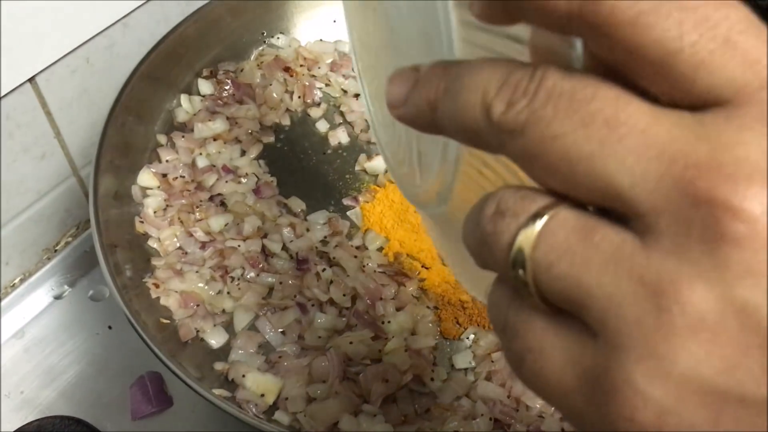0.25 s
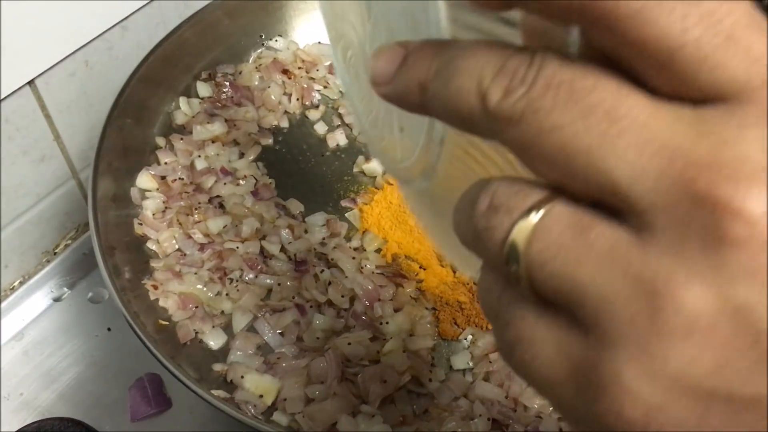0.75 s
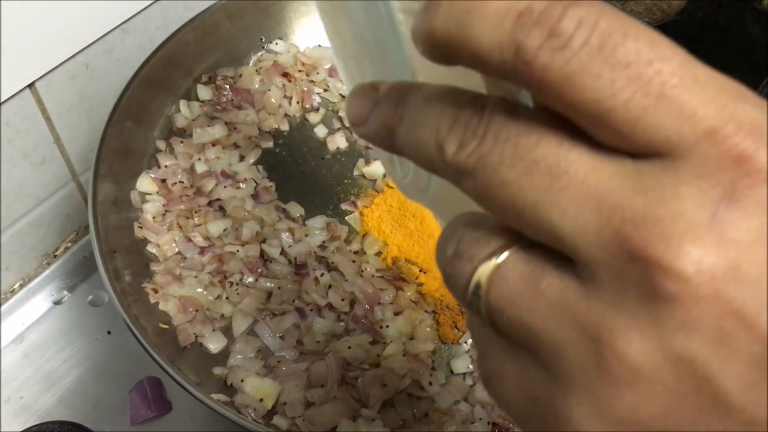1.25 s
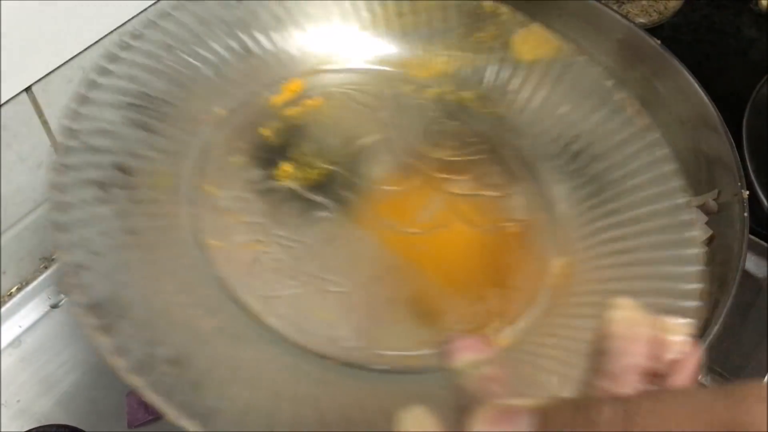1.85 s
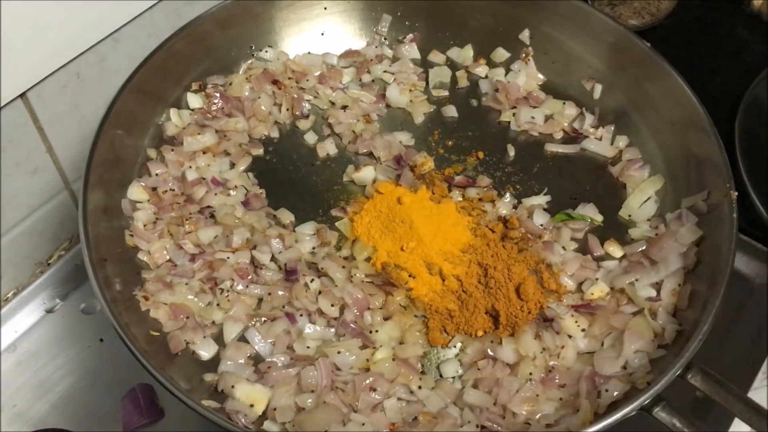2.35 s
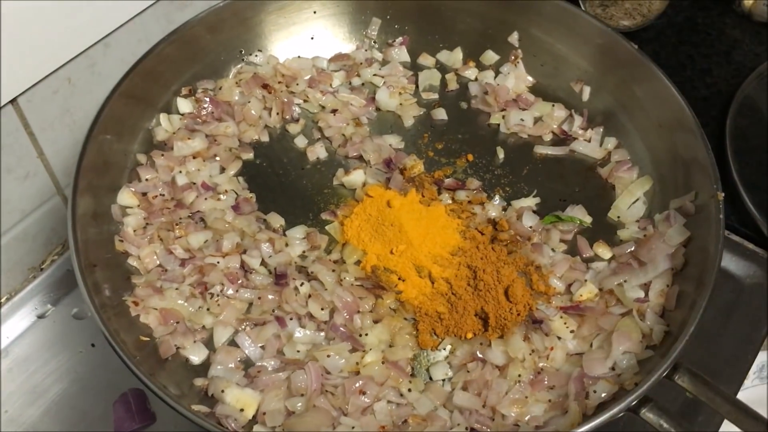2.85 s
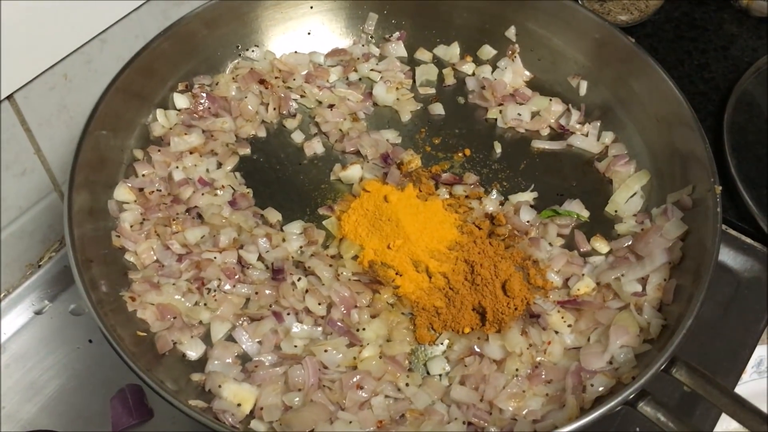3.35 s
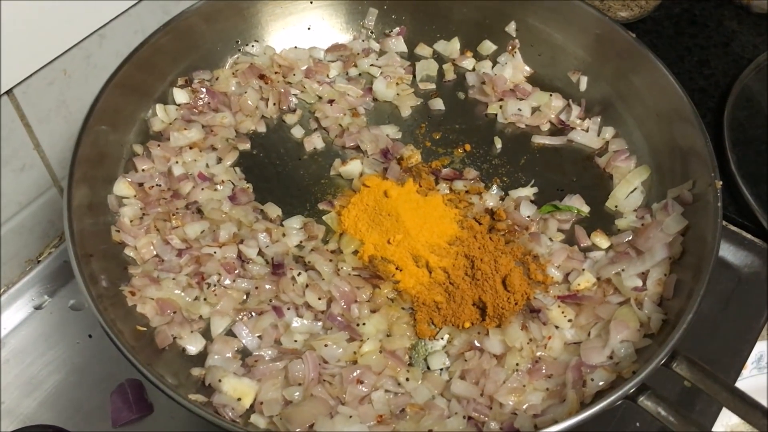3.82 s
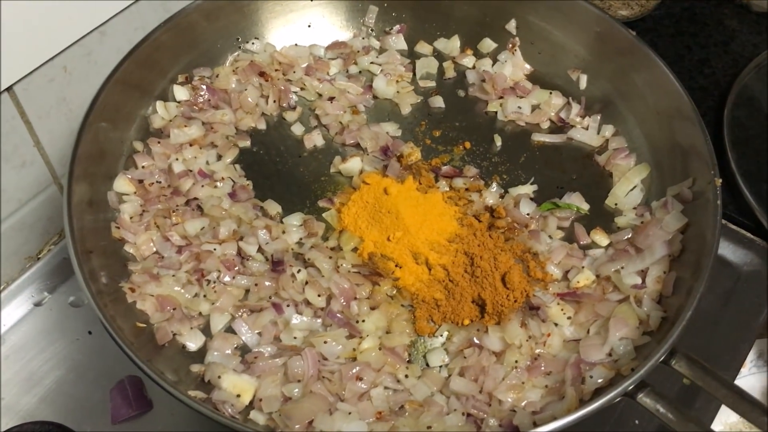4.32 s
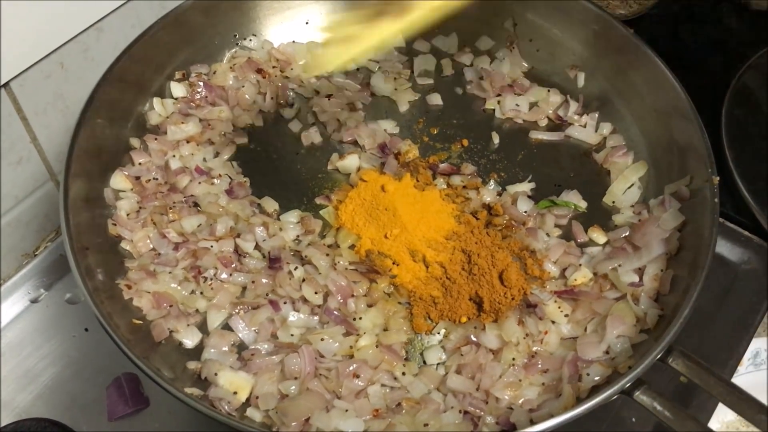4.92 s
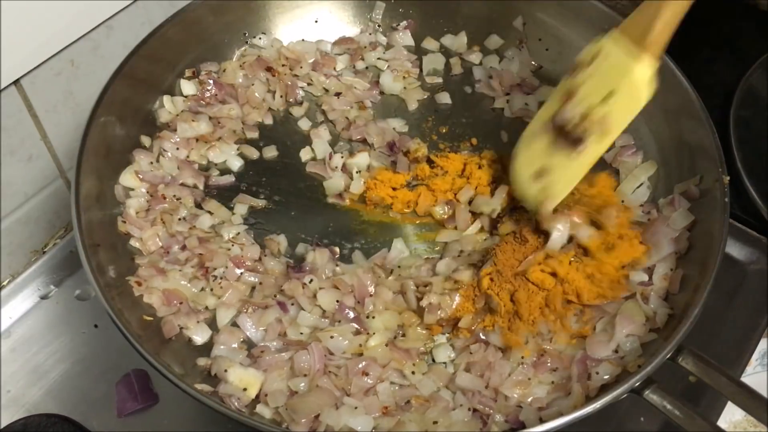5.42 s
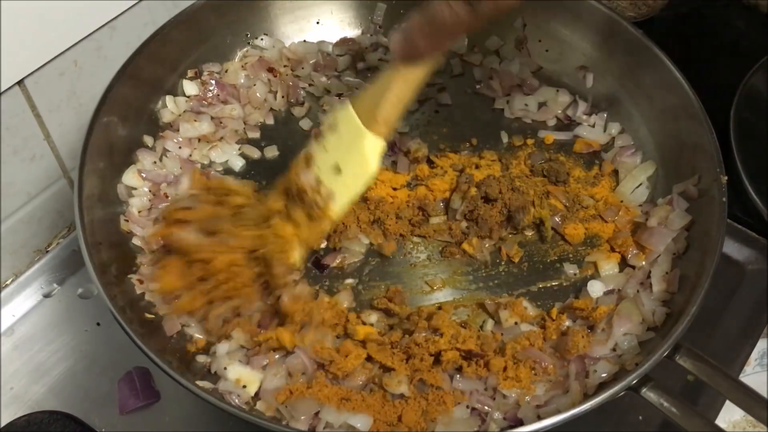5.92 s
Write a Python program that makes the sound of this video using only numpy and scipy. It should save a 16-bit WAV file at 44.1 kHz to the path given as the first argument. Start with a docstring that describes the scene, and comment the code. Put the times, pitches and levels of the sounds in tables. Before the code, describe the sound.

Light glassy clinks over gentle frying, a sharp knock, a plate set down rattling on a counter, then brief swells of sizzle as onions are stirred.

```python
"""Glass taps ring out over gently frying onions, in a small, hard-walled kitchen.
A plate is tapped on the rim of a steel pan to tip spices in, knocks the pan as it is drawn away,
is set down, rocks, and clatters against a dish; then a spatula turns the onions and the sizzle swells.
Contacts are decaying modes over a noise clack, frying is random bursts over hiss,
rocking is throbbing noise through counter resonances."""
import sys
import numpy as np
from scipy import signal
from scipy.fft import rfft, irfft, next_fast_len
from scipy.io import wavfile
from scipy.ndimage import uniform_filter1d

SR = 44100
rng = np.random.default_rng(int(sys.argv[2]) if len(sys.argv) > 2 else 0)


def transcribe(signal):
    """Save signal, clipped to [-1, 1], as a 16-bit WAV file at the path in sys.argv[1]."""
    frames = np.atleast_2d(signal).T
    limited = np.clip(frames, -1, 1)
    pcm = np.round(limited * 32767).astype(np.int16)
    wavfile.write(sys.argv[1], SR, pcm)


N = 272185
TIME = np.arange(N) / SR
RING_TIME = TIME[:SR // 4]
CUTOFF_HZ = 16000

# Spectrum of resting sizzle and spits: f/Hz, relative density/dB per Hz
SIZZLE_SPECTRUM = [(200, -9.5), (400, -10), (600, -5.5), (800, -12.5), (1200, -8.5), (1700, -10),
                   (2600, -10.5), (3300, -4), (4500, -6), (6000, -4.5), (7200, -2.5), (9000, -4.5),
                   (11500, -14), (16000, -16)]
# Modes of the dish: f/Hz, relative level/dB, t60 before grip and damping/s
DISH_MODES = [(1410, -4, 0.033), (1710, -7, 0.032), (2386, -3, 0.056), (2490, -4.5, 0.15),
              (3010, -6.5, 0.1), (3470, -21, 0.085), (4244, -9, 0.12), (5017, -7, 0.14), (5550, -5, 0.078),
              (6137, -1, 0.065), (6450, 5, 0.033), (6700, -10, .1), (7340, -12, 0.083), (7727, -1, 0.096),
              (8340, -3, 0.063), (8610, -6, 0.08), (9510, -9.5, 0.11), (11400, -9.5, 0.056),
              (12500, -16, 0.052), (13200, -14.5, 0.066), (14550, -30, 0.084), (15200, -13, 0.076)]
DISH_DAMPING = 1.2   # divides t60


def from_db(db):
    """Decibels to gain."""
    return 10 ** (np.asarray(db) / 20)


def rms_one(x):
    """Scale to unit rms."""
    return x / np.sqrt(np.mean(x ** 2) + 1e-20)


def at_hz(points, hz):
    """Interpolate a table over log frequency."""
    known_hz, values = np.transpose(points)
    return np.interp(np.log(np.maximum(hz, 1)), np.log(known_hz), values)


def coloured(x, spectrum):
    """Filter a signal by a dB spectrum; rms 1."""
    size = next_fast_len(len(x))
    gain = from_db(at_hz(spectrum, np.fft.rfftfreq(size, 1 / SR)))
    filtered = irfft(rfft(x, size) * gain, size)
    return rms_one(filtered[:len(x)])


def dying(t, t60):
    """Exponential decay, 60 dB in t60 seconds."""
    return np.exp(-np.log(1000) * t / t60)


def add(out, start_s, sound):
    """Mix a sound in at a time."""
    at = round(start_s * SR)
    out[at:at + len(sound)] += sound[:N - at]


def background():
    """Low room noise, plus an appliance hum of steady sines."""
    # Kitchen appliance: f/Hz, level/dB rms
    hum_tones = [(100, -86), (302, -81.5)]
    # Room noise: f/Hz, relative density/dB per Hz
    room_spectrum = [(12, -21), (20, 9), (103, -8.5), (204, -20), (300, -15), (343, -36), (435, -2.5),
                     (700, -56), (910, -49), (1540, -120)]
    room_db = -82.5
    hum = sum(from_db(db) * np.sqrt(2) * np.sin(2 * np.pi * hz * TIME) for hz, db in hum_tones)
    return hum + from_db(room_db) * coloured(rng.standard_normal(N), room_spectrum)


def diffuse_tail():
    """Crowded reflections: noise bands with their own decay, flattened so that no pitch is favoured."""
    # Reverberation: f/Hz, t60/s
    room_t60 = [(200, 0.94), (1000, 0.41), (3000, 0.46), (7000, 0.32), (15000, 0.29)]
    t, tail = TIME[:SR], 0
    white = rfft(rng.standard_normal(len(t)))
    hz = np.fft.rfftfreq(len(t), 1 / SR)
    edges_hz = np.geomspace(100, CUTOFF_HZ, num=9)
    for low, high in zip(edges_hz, edges_hz[1:]):
        band = irfft(white * ((hz >= low) & (hz < high)), len(t))
        tail = tail + band * dying(t, at_hz(room_t60, np.sqrt(low * high)))
    spectrum = rfft(tail)
    power = uniform_filter1d(np.abs(spectrum) ** 2, size=40)
    even = irfft(spectrum / np.sqrt(power + power.mean() / 20))[:SR // 2]
    return even / np.linalg.norm(even)


def kitchen(direct, spread):
    """Direct sound, plus the spread share convolved with near echoes and the diffuse tail."""
    # Hob, tiles, walls: delay/s, level re tail energy/dB
    echoes = [(.0031, -9), (.0047, -6.5), (0.0131, -7), (0.029, -32)]
    response = diffuse_tail()
    for delay_s, db in echoes:
        response[round(delay_s * SR)] += from_db(db)
    return direct + signal.fftconvolve(spread, response)[:N]


def frying(spectrum, bursts_per_s, spread_db, hiss):
    """Countless tiny steam bursts of uneven size and random sign, with a fine hiss; rms 1."""
    sizes = from_db(spread_db * np.minimum(rng.exponential(1, N), 6)) * rng.choice([-1, 1], N)
    bursts = rms_one(sizes * (rng.random(N) < bursts_per_s / SR))
    return coloured(bursts + hiss * rng.standard_normal(N), spectrum)


def resting_sizzle():
    """Resting onions sizzle steadily, easing off a little."""
    start_db, fade_db_per_s = -60, 0.31
    sizzle = frying(SIZZLE_SPECTRUM, bursts_per_s=2000, spread_db=3.0, hiss=1.63)
    return from_db(start_db - fade_db_per_s * TIME) * sizzle


def spits():
    """Larger droplets burst with a bright tick of decaying noise."""
    # Loudest spits: t/s, level before decay/dB
    loud = [(0.911, -46.5), (1.9654, -53), (2.112, -47.5), (3.2385, -45), (4.816, -50)]
    faint_per_s, faint_db, faint_spread_db = 4, -59, 3.5
    tick_t60_s = 0.0094
    out, t = np.zeros(N), RING_TIME
    moments = TIME[rng.random(N) < faint_per_s / SR]
    faint = [(s, faint_db + faint_spread_db * rng.standard_normal()) for s in moments]
    for s, db in loud + faint:
        tick = coloured(rng.standard_normal(len(t)), SIZZLE_SPECTRUM) * dying(t, tick_t60_s)
        add(out, s, from_db(db) * tick)
    return out


def stirring_gain():
    """Wet onion on hot steel flares per stroke, sags as the steel dries, then dies; tumbling adds flicker."""
    # Spatula strokes: start/s, length/s, sizzle level before sag and flicker/dB
    strokes = [(5.264, .06, -53.5), (5.366, 0.26, -56.5), (5.706, .5, -53.5)]
    attack_s, sag_db_per_s, release_t60_s = 0.021, 2, 1
    flicker_spread_db, flickers_per_s = 1.3, 71
    power = 0
    for start_s, length_s, db in strokes:
        age = np.maximum(TIME - start_s, 0)
        flare = np.minimum(age / attack_s, 1) * from_db(db - sag_db_per_s * age)
        release = dying(np.maximum(age - length_s, 0), release_t60_s)
        power = power + (flare * release) ** 2
    chance = rng.standard_normal(size=1000)
    flicker = np.interp(TIME * flickers_per_s, np.arange(len(chance)), chance)
    return np.sqrt(power) * from_db(flicker_spread_db * flicker)


def stirred_sizzle():
    """Denser steam bursts, shaped by the spatula strokes."""
    # Stirred sizzle: f/Hz, relative density/dB per Hz
    stir_spectrum = [(200, -37), (450, -11.5), (800, -14.5), (1200, -9.5), (2100, -11), (2800, -9),
                     (3600, -3), (4300, -6), (7200, 0.5), (9000, -2.5), (11000, -10), (16000, -12)]
    return stirring_gain() * frying(stir_spectrum, bursts_per_s=9200, spread_db=3.5, hiss=1.0)


def bumps():
    """Low thumps: a short low-frequency pulse and a dull thud of decaying noise."""
    # Low thumps: t/s, push peak/dB, thud level before decay/dB
    bump_rows = [(1.6659, -37.5, -60), (4.113, -70, -34.5), (5.799, -79, -50)]
    # Dull thud: f/Hz, relative density/dB per Hz
    thud_spectrum = [(20, -24), (180, -20), (280, -27), (450, 24), (1100, 21), (2000, -28), (5000, -47)]
    push_rise_s, thud_t60_s = 0.0005, 0.013
    out, t = np.zeros(N), RING_TIME
    push = t / push_rise_s * np.exp(1 - t / push_rise_s)
    for s, push_db, thud_db in bump_rows:
        thud = coloured(rng.standard_normal(len(t)), thud_spectrum) * dying(t, thud_t60_s)
        add(out, s, from_db(push_db) * push + from_db(thud_db) * thud)
    return out


def rocking():
    """The plate wobbles on its foot and shakes the counter's resonances in quick throbs."""
    # Counter resonances: f/Hz, width/Hz, relative gain/dB
    counter = [(327, 7.8, -4), (510, 80, -2), (617, 45, 2.5), (800, 35, 1), (878, 17, 3), (1000, 53, -6.5),
               (1130, 74, -3.5), (1560, 550, -15), (2430, 13, 5)]
    rocks_per_s, rock_depth = 15.17, .5
    set_down_s, jolt_db, jolt_t60_s = 2.815, -38.5, 0.66
    wobble_db, wobble_t60_s, rest_s, settle_s = -60, 6.6, 3.83, 0.31
    throb = 1 + rock_depth * np.cos(2 * np.pi * rocks_per_s * TIME)
    force, shaken = throb * rng.standard_normal(N), 0
    for hz, width_hz, db in counter:
        b, a = signal.iirpeak(hz, hz / width_hz, fs=SR)
        shaken = shaken + from_db(db) * signal.lfilter(b, a, force)
    age = np.maximum(TIME - set_down_s, 0)
    jolt = from_db(jolt_db) * dying(age, jolt_t60_s)
    settling = np.clip((rest_s - TIME) / settle_s, 0, 1)
    wobble = from_db(wobble_db) * dying(age, wobble_t60_s) * settling
    return (age > 0) * np.hypot(jolt, wobble) * rms_one(shaken)


def blows(rows, modes, damping, favour_db, scatter_db, clack_db, room_db, contact_s):
    """Contacts ring the modes, most near one pitch, over a clack of crowded small modes.
    Returns the direct sound and the share sent into the room."""
    # Dry clack of a contact: f/Hz, density/dB per Hz
    clack_spectrum = [(60, -23), (200, -31.5), (320, -10), (550, -11.5), (950, -2), (2000, -1.5),
                      (4000, 2.5), (7000, 2.5), (9500, -6.5), (12000, -13.5), (16000, -33)]
    detune, clack_t60_s = .003, 0.049   # detune: relative spread of mode pitch
    direct, spread, t = np.zeros(N), np.zeros(N), RING_TIME
    hz, mode_db, t60 = np.transpose(modes)
    for s, db, body, treble, favoured_hz, freedom in rows:
        tone = [(500, body / 3), (1200, body), (1700, body), (2500, 0), (7900, 0), (9000, treble)]
        favour = favour_db / (1 + ((hz - favoured_hz) / 110) ** 2)
        scatter = scatter_db * rng.standard_normal(len(hz))
        strength = from_db(mode_db + at_hz(tone, hz) + favour + scatter)
        # grip and contact shift each mode a little
        loaded_hz = hz * (1 + detune * rng.standard_normal(len(hz)))
        phase = 2 * np.pi * (loaded_hz[:, None] * t + rng.random((len(hz), 1)))
        ring = strength @ (np.sin(phase) * dying(t, t60[:, None] * freedom / damping))

        clack_tone = [(f, d + at_hz(tone, f)) for f, d in clack_spectrum]
        clack_gain = from_db(at_hz(clack_tone, np.linspace(0, CUTOFF_HZ, num=64)))
        clack_size = np.sqrt(np.mean(clack_gain ** 2))
        clack_noise = coloured(rng.standard_normal(len(t)), clack_tone)
        clack = clack_size * clack_noise * dying(t, clack_t60_s)

        onset = 1 - np.exp(-t / contact_s)
        blow = (ring + from_db(clack_db) * clack) * onset
        blow = from_db(db) * blow / np.std(blow[:SR // 100])   # level is that of the first 10 ms
        add(direct, s, blow)
        add(spread, s, freedom * from_db(room_db) * blow)
    return direct, spread


def rattles():
    """After a hard contact the plate chatters: unevenly spaced contacts that grow weaker."""
    # Rattles: start/s, length/s, typical gap/s, first level/dB, extra body/dB, favoured f/Hz
    runs = [(2.8227, 0.011, .006, -25, 3.5, 7806), (3.9226, 0.065, .012, -36, -4, 6105),
            (4.135, .022, .009, -30, 3, 4210)]
    fade_db_per_s, unevenness, treble_db = 98, .2, -0.5
    rows = []
    for start_s, length_s, gap_s, db, body, favoured_hz in runs:
        gaps = gap_s * np.exp(unevenness * rng.standard_normal(size=20))
        after = np.cumsum(gaps) - gaps[0]
        for s in after[after < length_s]:
            rows.append((start_s + s, db - fade_db_per_s * s, body, treble_db, favoured_hz, 1))
    return blows(rows, DISH_MODES, DISH_DAMPING, favour_db=3.5, scatter_db=3, clack_db=8,
                 room_db=-9, contact_s=0.00061)


def clatter():
    """The plate is put down, then jostled against a dish, ringing the dish modes."""
    # Blows: t/s, level/dB, extra body/dB, extra treble/dB, favoured f/Hz, ring freedom of grip [1 = usual]
    rows = [(2.8146, -18, 0.5, 0.5, 7840, 0.84), (2.9722, -32.5, -4, -0.5, 6100, 0.72),
            (3.7305, -36.5, 18, -7, 1830, 0.9), (3.7749, -30, -4, 1.5, 2390, 0.85),
            (3.8306, -23, -2, 1.5, 6115, 0.56), (3.8493, -29, -9, 1, 3000, 0.5),
            (3.8604, -29.5, -31, 1, 6050, 1.3), (3.8829, -28, -28, -6, 6105, 1.4),
            (3.9138, -31.5, -2, -1, 6105, 0.59), (4.0506, -47, 28, 0, 1830, 1.4),
            (4.113, -25, 14, -6.5, 4100, 1.15)]
    return blows(rows, DISH_MODES, DISH_DAMPING, favour_db=9.5, scatter_db=2.5, clack_db=7,
                 room_db=-8, contact_s=0.00043)


def knocks():
    """The plate hits the pan as it is drawn away, ringing the pan modes."""
    # Blows: t/s, level/dB, extra body/dB, extra treble/dB, favoured f/Hz, ring freedom of grip [1 = usual]
    rows = [(1.6666, -15, -7, 0.83, 6790, 1.04), (2.1619, -31, -5.5, 2.2, 5200, 1.02),
            (2.2133, -43.5, -2, 1, 6900, 0.73), (2.4519, -30, -4.5, 4.9, 8100, .55)]
    # Pan modes: f/Hz, relative level/dB, t60 before grip and damping/s
    modes = [(2448, -11, 0.18), (2970, -7, 0.052), (3520, -10, 0.09), (4264, -3, 0.065), (4450, -6, 0.045),
             (4930, 0, 0.046), (5600, -4, 0.069), (5600, -7, 0.067), (6520, 2, 0.031), (6730, -0.5, 0.034),
             (6865, 2.5, 0.042), (7780, 1, 0.061), (8200, -1, 0.042), (8760, -5.5, 0.086),
             (9070, -8.5, 0.077), (9830, -10.5, 0.06), (11230, -14, .05), (13100, -18, 0.045),
             (14500, -15, 0.049)]
    return blows(rows, modes, damping=1.7, favour_db=5.5, scatter_db=2.0, clack_db=2.5,
                 room_db=-8.0, contact_s=.0006)


def taps():
    """The plate edge taps the pan rim, ringing the glass, damped by the hand."""
    # Blows: t/s, level/dB, extra body/dB, extra treble/dB, favoured f/Hz, ring freedom of grip [1 = usual]
    rows = [(0.0689, -26, 5.5, -0.5, 4020, 1.1), (0.3233, -37.5, -4.5, 7, 2440, 0.77),
            (0.4711, -29.5, 3.5, 3, 6060, 0.93), (0.7562, -33.5, -1, 6, 7900, 1),
            (0.7708, -35, 6.5, -2.5, 3900, 1.26), (1.0048, -30.5, -6, -3, 2980, 0.94),
            (1.0791, -25, 1.5, -1, 4960, 1.02), (1.3127, -35, 6, -0.5, 2630, 0.79),
            (1.3535, -44.5, 6.5, -3, 4953, 0.73), (1.4109, -40.5, 3, -3, 5700, 0.98)]
    # Plate modes: f/Hz, relative level/dB, t60 before grip and damping/s
    modes = [(2444, -5.5, 0.092), (2977, -8.5, 0.049), (4020, -0.5, 0.029), (3988, -5, 0.15),
             (4125, -5.5, 0.043), (4964, -2, 0.054), (5940, -2, 0.024), (6192, 7, 0.033),
             (6394, 1.5, 0.045), (7694, 1, 0.042), (7780, -10, 0.074), (8810, -6.5, 0.062),
             (9065, -1.5, 0.046), (10220, -10.5, 0.056), (11180, -14.5, 0.051), (12100, -14, 0.066),
             (14500, -22, 0.07), (15100, -25, .06)]
    return blows(rows, modes, damping=1.3, favour_db=8, scatter_db=2.0, clack_db=1.5,
                 room_db=-6.5, contact_s=0.001)


def scene():
    """Struck plate, pan and dish with room sound; frying, low thuds and background without."""
    direct, spread = np.sum([taps(), knocks(), clatter(), rattles()], axis=0)
    struck = kitchen(direct, spread)
    oil = resting_sizzle() + stirred_sizzle() + spits()
    low = rocking() + bumps()
    return (struck + oil + low + background())[None]


def record(dry):
    """Soft saturation rounds the loudest peaks; a steep low-pass cuts the top."""
    top = .75   # full-scale fraction that peaks approach
    rounded = top * np.tanh(dry / top)
    low_pass = signal.cheby2(16, 70, CUTOFF_HZ + 1000, fs=SR, output="sos")
    return signal.sosfilt(low_pass, rounded)


dry = scene()
out = record(dry)
transcribe(out)
```